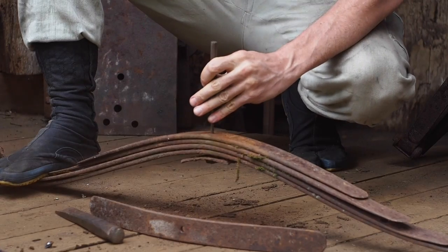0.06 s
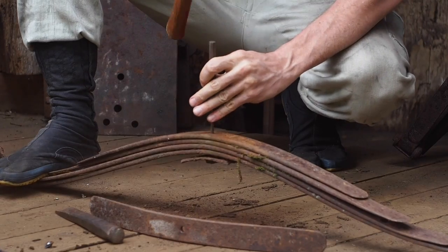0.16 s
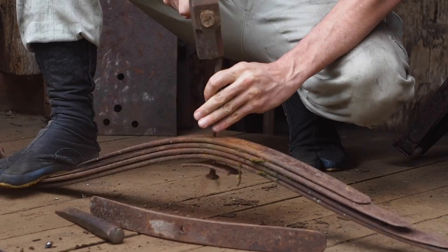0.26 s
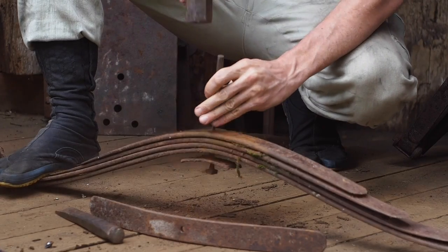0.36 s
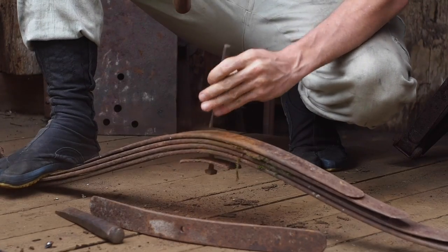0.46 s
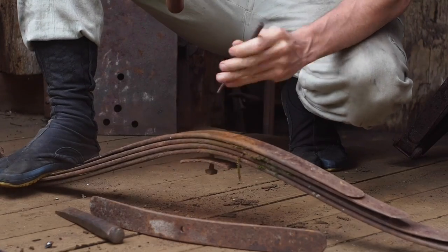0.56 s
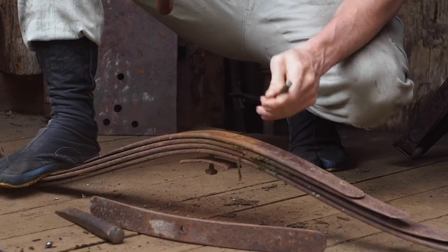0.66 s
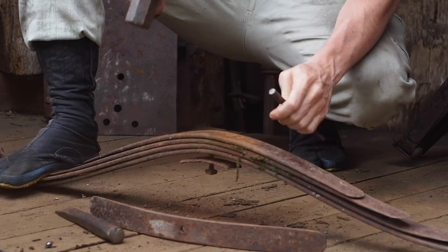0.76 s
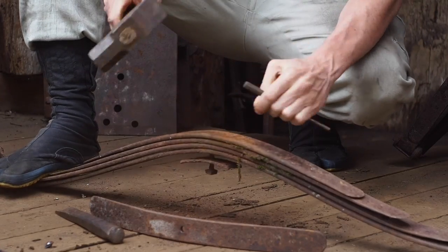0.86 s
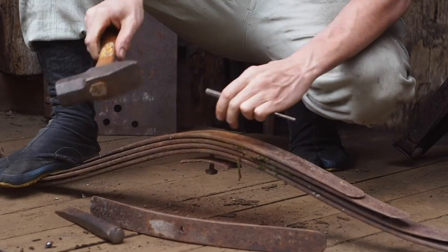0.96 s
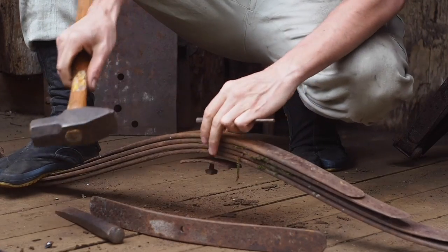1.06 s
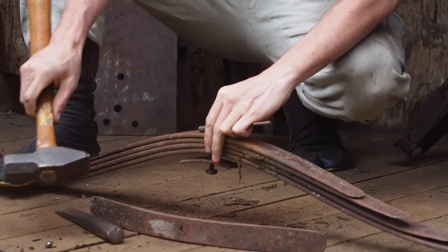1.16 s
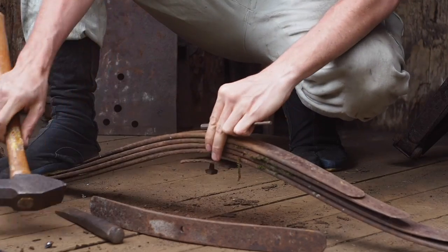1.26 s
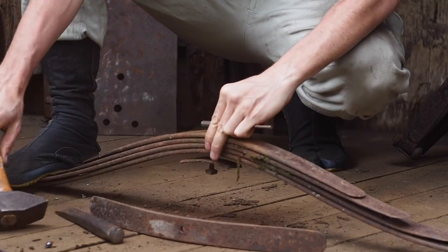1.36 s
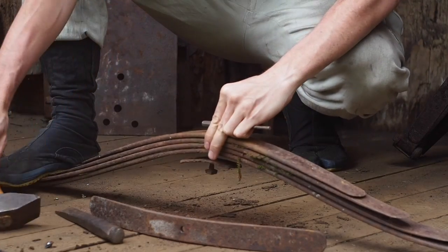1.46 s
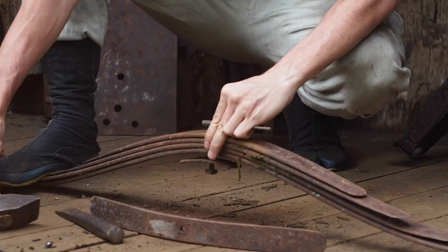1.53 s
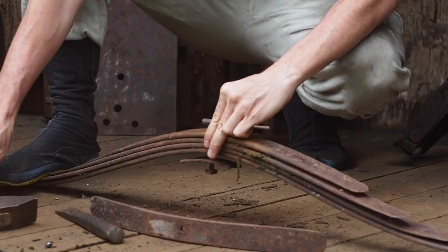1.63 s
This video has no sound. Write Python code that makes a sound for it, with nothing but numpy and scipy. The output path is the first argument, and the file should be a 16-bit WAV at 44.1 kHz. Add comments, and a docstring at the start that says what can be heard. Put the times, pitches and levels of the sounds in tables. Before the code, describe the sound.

A hard hammer blow on a steel punch cracks and rings, spring leaves chattering and a pin clinking loose; then a light metal clink and the hammer knocking down on floorboards, close stereo microphone, quiet workshop.

```python
"""On a plank floor, close by, a hammer drives a punch through an old steel leaf spring.
The steel still sings from an earlier blow; the new one cracks, rings and rattles the leaves, and the pin drops out.
The punch is laid on the spring with a clink and the hammer is set down on the boards.
Rings are sums of damped sines; clashes, scuffs and air are coloured stereo noise. A limiter ducks the big blow."""
import sys
import numpy as np
from scipy import signal
from scipy.fft import rfft, irfft, next_fast_len
from scipy.io import wavfile
from scipy.ndimage import map_coordinates

SR = 44100
rng = np.random.default_rng(int(sys.argv[2]) if len(sys.argv) > 2 else 0)


def generate_wav(signal):
    """Clip the signal to [-1, 1] and save it as 16-bit WAV at the path in sys.argv[1]."""
    frames = np.transpose(np.atleast_2d(signal))
    scaled = np.clip(frames, -1, 1) * 32767
    pcm = np.round(scaled).astype(np.int16)
    wavfile.write(sys.argv[1], SR, pcm)


N = 74970
BLOW_S, TAP_S = 0.2272, 1.1182


def amp(db):
    """Decibels to gain."""
    return 10 ** (np.asarray(db) / 20)


def along(points, hz):
    """Interpolate (Hz, value) points on a log frequency axis."""
    f, v = np.transpose(points)
    return np.interp(np.log(hz + 1), np.log(f + 1), v)


def since(start_s):
    """Seconds since start_s, zero before it."""
    return np.maximum(np.arange(N) / SR - start_s, 0)


def decay(t60s_elapsed):
    """Exponential decay: 60 dB down per t60 elapsed."""
    return np.exp(-np.log(1000) * t60s_elapsed)


def wobble(knots_per_s):
    """A smooth random curve through normally distributed knots."""
    knots = rng.standard_normal(int(N * knots_per_s / SR) + 4)
    return map_coordinates(knots, [np.arange(N) * knots_per_s / SR])


def filtered(x, response):
    """Multiply the spectrum of x by a response of frequency."""
    size = next_fast_len(N + SR // 4)
    return irfft(rfft(x, size) * response(np.fft.rfftfreq(size, 1 / SR)), size)[..., :N]


def panned(left_minus_right_db):
    """Left and right gains for a level difference."""
    half_db = np.array([left_minus_right_db, -left_minus_right_db]).reshape(2, -1) / 2
    return amp(half_db)


# Stereo likeness of noise. Each row: frequency in Hz, left-right correlation before the lean.
ALIKE = [(100, 0.98), (500, 0.94), (1200, 0.82), (2500, 0.31), (6000, .45), (12000, 0.45)]
# Stereo lean of noise. Each row: frequency in Hz, left minus right in dB.
LEAN = [(100, 1.76), (500, 0.96), (2000, -1), (5000, -.5), (9000, 0), (13000, -1)]


def noise(colour):
    """Coloured stereo noise of rms 1, wider in the treble: mid and side share the power."""
    def mid_side_gains(hz):
        angle = np.arccos(np.clip(along(ALIKE, hz), -1, 1)) / 2
        return amp(along(colour, hz)) * [np.cos(angle), np.sin(angle)]

    mid, side = filtered(rng.standard_normal((2, N)), mid_side_gains)
    pair = filtered(np.array([mid + side, mid - side]), lambda hz: panned(along(LEAN, hz)))
    return pair / pair.std()


def envelope(start_s, t60_s, rise_s):
    """A quick rise (time constant rise_s) and an exponential decay."""
    t = since(start_s)
    return decay(np.minimum(t / t60_s, 10)) * (1 - np.exp(-t / rise_s))


def wash(start_s, colour, t60s, rise_s):
    """Countless weak modes struck together, as noise whose bands each die at their own speed."""
    hz, t, bands = signal.stft(noise(colour), SR, nperseg=256)
    fade = decay(np.maximum(t - start_s, 0) / along(t60s, hz)[:, None])
    faded = signal.istft(bands * fade, SR, nperseg=256)[1][:, :N]
    return faded * (1 - np.exp(-since(start_s) / rise_s))


def ring(start_s, modes, rise_s):
    """Struck modes as a sum of damped sines."""
    return sum(amp(db) * envelope(start_s, t60_s, rise_s) * np.sin(2 * np.pi * hz * since(start_s))
               for hz, db, t60_s in modes)


# Background spectrum. Each row: frequency in Hz, relative level in dB.
AIR_COLOUR = [(25, -38.5), (60, -21.5), (130, -10), (200, -12.5), (260, -8.5), (320, -7.5), (400, -3.5),
              (490, -7.5), (600, -17.5), (730, -11), (860, -16.5), (1250, -22.5), (1600, -26.5),
              (2100, -32), (4000, -33), (7000, -34), (10000, -41), (15000, -49.5)]
# Background level, before a slight wobble. Each row: time in seconds, rms level in dB.
AIR_LEVEL = [(0, -53.5), (.2, -51.5), (0.601, -49.5), (.72, -51.5), (.85, -52), (1.05, -51), (1.35, -52),
             (1.7, -53.5)]


def workshop_air():
    """A soft, hollow background rush: noise with a slowly drifting, slightly wavering level."""
    level_db = np.interp(since(0), *np.transpose(AIR_LEVEL))
    return noise(AIR_COLOUR) * amp(level_db + 0.39 * wobble(21))


# Long, pure ring of the earlier blow. Each row: frequency in Hz, level in dB, t60 in s before extra damping.
SINGING = [(1703.6, -43.5, 2.8), (3534, -70.5, 1.1), (8850, -74.5, 0.32)]
EXTRA_DAMPING_T60_S = 2.5


def singing_steel():
    """The earlier ring fades, faster once the spring is struck again."""
    return ring(0, SINGING, rise_s=0.00033) * decay(since(BLOW_S) / EXTRA_DAMPING_T60_S)


# Handling of tools. Each row: start in seconds, level in dB, t60 in seconds.
SCUFFS = [(.133, -62.5, .12), (.757, -60, .12), (1.382, -50, .13), (1.472, -54, 0.061),
          (1.621, -58.5, 0.41)]
# Scuff spectrum. Each row: frequency in Hz, relative level in dB.
SCUFF_COLOUR = [(1000, -14.5), (2500, -7.5), (4500, -4), (8500, -7.5), (11000, -22), (15000, -29)]


def handling():
    """Faint bright scuffs: short bursts of one coloured noise."""
    bursts = sum(amp(db) * envelope(s, t60_s, rise_s=0.003) for s, db, t60_s in SCUFFS)
    return noise(SCUFF_COLOUR) * bursts


# Hammer face on punch head. Each row: frequency in Hz, level in dB before panning, t60 in seconds.
CRACK = [(3500, -10, 0.0047), (4994, 8, 0.0047), (6031, 11, .0045), (7900, 7, .005), (9490, 0, 0.0082),
         (11920, -5.5, 0.00517)]
CRACK_RISE_S, LEFT_LAG_S = 0.00056, 0.000014


def crack():
    """Hard contact: very short modes, reaching the left side slightly late."""
    sides = [ring(BLOW_S + lag_s, CRACK, CRACK_RISE_S) for lag_s in (LEFT_LAG_S, 0)]
    return np.array(sides) * panned(-1.5)


MODE_SPREAD_RAD, MODE_WANDER_RAD = 0.48, 0.16


def steel_mode(start_s, hz, db, t60_s, pan_db, rise_s):
    """One damped steel mode, wavering slightly and reaching each side in its own phase."""
    spread = MODE_SPREAD_RAD * rng.choice([-1, 1]) * np.array([[1], [-1]])
    wander = MODE_WANDER_RAD * np.array([wobble(45), wobble(45)])
    phase = rng.uniform(0, 2 * np.pi) + spread + wander
    tone = np.sin(2 * np.pi * hz * since(start_s) + phase)
    return amp(db) * panned(pan_db) * envelope(start_s, t60_s, rise_s) * tone


# Modes of spring and punch. Each row: frequency in Hz, relative level in dB under the hammer,
# relative level in dB under a light tap, t60 in seconds, left minus right in dB.
STEEL = [(1075, -37, -44, .13, 0), (1400, -42, -51, .13, 0), (1895, -39, -43, .44, -2),
         (1938, -34, -56, .45, 0), (2030, -38, -49, .25, -2), (2401, -35, -41, .34, -3),
         (2600, -39, -39, .41, -6), (2696, -29, -65, .42, -1), (2736, -26, -65, .25, -3),
         (2953, -29, -46, .36, 3), (3435, -34, -52, .4, 0), (3510, -30, -61, .66, 0),
         (3601, -28, -36, .21, -2), (3693, -24, -52, .2, 0), (4254, -24, -33, .24, 2),
         (4285, -28, -40, .22, -2), (4635, -30, -52, .35, 1), (5010, -24, -32, .2, 4),
         (5180, -28, -46, .36, -4), (5303, -34, -38, .34, 7), (5624, -26, -38, .37, 3),
         (5809, -17, -28, .16, -7), (6464, -23, -47, .3, 2), (6658, -21, -28, .23, -2),
         (6845, -29, -49, .62, -3), (7364, -22, -21, .2, 3), (7544, -26, -25, .24, 0),
         (7760, -28, -31, .15, -10), (8086, -26, -30, .16, 4), (8500, -25, -30, .19, -3),
         (8845, -36, -44, .3, 0), (9012, -27, -39, .26, -7), (9440, -33, -45, .21, -4),
         (9938, -41, -36, .2, -4), (11000, -38, -48, .19, -3), (11230, -41, -56, .26, -5),
         (12270, -44, -75, .18, -4), (13000, -46, -50, .13, -8)]
# Partials that swell as the loosened punch and leaves rattle. Each row: start in seconds, frequency in Hz,
# relative level in dB, t60 in seconds, rise time constant in seconds.
SWELLS = [(.258, 6843, -16.5, .36, .014), (.325, 4256, -29, .3, .02), (.345, 4287, -37, .26, .015),
          (.352, 1050, -39, .13, .003), (.4, 9841, -56, .45, .02)]
BLOW_RING_GAIN_DB = 2.2


def struck_steel():
    """The blow rings all spring and punch modes; a few partials swell in afterwards."""
    modes = sum(steel_mode(BLOW_S, hz, db, t60_s, pan_db, rise_s=0.00033)
                for hz, db, _, t60_s, pan_db in STEEL)
    swells = sum(steel_mode(s, hz, db, t60_s, -2.5, rise_s) for s, hz, db, t60_s, rise_s in SWELLS)
    return amp(BLOW_RING_GAIN_DB) * (modes + swells)


# Leaf contacts, the first a clash, the rest rebounds. Each row: start in seconds, relative level in dB.
CLASHES = [(.2275, -18), (.256, -26), (.281, -27), (.299, -29), (.351, -33), (.394, -43)]
# Clash spectrum. Each row: frequency in Hz, relative level in dB.
CLASH_COLOUR = [(200, -30), (500, -10), (1400, -10.5), (2000, -7), (2800, -5.5), (3300, -6.5), (4500, -2.5),
                (6500, -3.5), (8300, -7.5), (10000, -15), (12500, -27), (15000, -40.5)]
# Clash decay. Each row: frequency in Hz, t60 in seconds.
CLASH_T60 = [(500, .3), (2000, 0.4), (6000, .34), (9000, 0.35), (13000, .22)]
CHATTER_T60_S, CHATTER_DULL_HZ = 0.081, 8000
CHATTER_FLICKER_DB, FLICKER_KNOTS_PER_S = 4, 380


def chattering_leaves():
    """The leaves clash as a wash, then chatter in duller, flickering noise bursts."""
    (first_s, first_db), *rebounds = CLASHES
    clash = amp(first_db) * wash(first_s, CLASH_COLOUR, CLASH_T60, rise_s=0.00044)
    clash = clash * amp(0.99 * wobble(FLICKER_KNOTS_PER_S))
    bursts = sum(amp(db) * envelope(s, CHATTER_T60_S, rise_s=0.001) for s, db in rebounds)
    flicker = amp(CHATTER_FLICKER_DB * wobble(FLICKER_KNOTS_PER_S))
    chatter = noise(CLASH_COLOUR) * bursts * flicker
    return clash + filtered(chatter, lambda hz: 1 / (1 + (hz / CHATTER_DULL_HZ) ** 6))


# Modes of the floorboards. Each row: frequency in Hz, relative level in dB, t60 in seconds.
PLANKS = [(108, -12, .22), (194, -12, .16), (282, -3, .16), (324, -3, .15), (385, -4, .06), (475, -7, .08),
          (620, -16, .07), (732, -20, .08), (920, -17, .07), (1087, -20, .08)]
# Thud decay. Each row: frequency in Hz, t60 in seconds.
THUD_T60 = [(100, 0.43), (400, .17), (3000, 0.21)]


def planks(knocks, colour):
    """Each knock rings the boards and adds a dull thud."""
    total = 0
    for start_s, ring_db, thud_db in knocks:
        boards = amp(ring_db) * panned(0.98) * ring(start_s, PLANKS, rise_s=0.00097)
        thud = amp(thud_db) * wash(start_s, colour, THUD_T60, rise_s=0.00073)
        total = total + boards + thud
    return total


# Spring and pin on the floor. Each row: start in seconds, board ring gain in dB, thud noise gain in dB.
JOLTS = [(.234, -24.5, -38), (.26, -32, -37), (.28, -45, -33), (.353, -32.5, -39.5), (.545, -72, -56.5)]
# Jolt thud spectrum. Each row: frequency in Hz, relative level in dB.
JOLT_COLOUR = [(30, -61), (60, -32), (95, -4), (140, 0.5), (200, -10), (340, 1), (600, -14), (900, -17.5),
               (1050, -6.5), (1300, -22.5), (3000, -33), (12000, -75)]


def jolted_floor():
    """The jolted spring and the pin knock on the boards."""
    return planks(JOLTS, JOLT_COLOUR)


# Modes of the loose pin. Each row: frequency in Hz, level in dB, t60 in seconds.
PIN = [(5770, -43, 0.13), (7700, -41, 0.11), (8200, -43, 0.054), (13000, -72.5, .06)]
PIN_S = 0.454


def freed_pin():
    """The loose pin clinks once, as a few damped sines."""
    return ring(PIN_S, PIN, rise_s=0.00071)


# Tap noise spectrum. Each row: frequency in Hz, relative level in dB.
TAP_COLOUR = [(400, -42), (1000, -15.5), (1600, -13.5), (2200, -9.5), (4000, -7), (5500, -0.5), (7800, -5),
              (10000, -6.5), (12000, -37), (15000, -42.5)]
TAP_RING_GAIN_DB, TAP_NOISE_DB, TAP_T60_S = 0.3, -29, 0.13


def punch_laid_down():
    """A light steel-on-steel contact rings the same modes, mostly the high ones, with a noise burst."""
    modes = sum(steel_mode(TAP_S, hz, db, t60_s, pan_db, rise_s=0.00121)
                for hz, _, db, t60_s, pan_db in STEEL)
    contact = amp(TAP_NOISE_DB) * noise(TAP_COLOUR) * envelope(TAP_S, TAP_T60_S, rise_s=0.0005)
    return amp(TAP_RING_GAIN_DB) * modes + contact


# Hammer head and handle settling. Each row: start in seconds, board ring gain in dB, thud noise gain in dB.
KNOCKS = [(1.396, -26, -23.5), (1.4085, -20, -30), (1.4421, -41.5, -34), (1.456, -29, -43.5),
          (1.5, -40, -45.5), (1.696, -34.5, -46.5)]
# Knock thud spectrum. Each row: frequency in Hz, relative level in dB.
THUD_COLOUR = [(25, -51), (55, -29), (110, -15), (170, -9.5), (320, -1.5), (480, -11.5), (700, -19.5),
               (1050, -21.5), (1500, -30), (2500, -40.5), (5000, -58), (12000, -79)]


def hammer_set_down():
    """The hammer's head and handle settle on the boards."""
    return planks(KNOCKS, THUD_COLOUR)


def scene():
    """All sources together."""
    background = workshop_air() + singing_steel() + handling()
    blow = crack() + struck_steel() + chattering_leaves() + jolted_floor() + freed_pin()
    return background + blow + punch_laid_down() + hammer_set_down()


LIMIT_DB, RELEASE_DB_PER_S, LIMIT_SMOOTHING_S = -5.5, 183, 0.0014
RUMBLE_CUT_HZ, TOP_HZ = 55, 15500


def record(dry):
    """A limiter that is too slow for the crack, a low cut, clipping, and the band limit."""
    peak_db = 20 * np.log10(np.abs(dry).max(axis=0) + 1e-9)
    over_db = np.maximum(peak_db - LIMIT_DB, 0)
    # running peak of the overshoot, released at a constant dB rate
    recovery_db = RELEASE_DB_PER_S * since(0)
    duck_db = np.maximum.accumulate(over_db + recovery_db) - recovery_db
    keep = np.exp(-1 / (LIMIT_SMOOTHING_S * SR))
    limited = dry * amp(-signal.lfilter([1 - keep], [1, -keep], duck_db))
    low_cut = signal.butter(2, RUMBLE_CUT_HZ, 'highpass', fs=SR, output='sos')
    clipped = np.clip(signal.sosfilt(low_cut, limited), -1, 1)
    return filtered(clipped, lambda hz: hz < TOP_HZ)


dry = scene()
out = record(dry)
generate_wav(out)
```